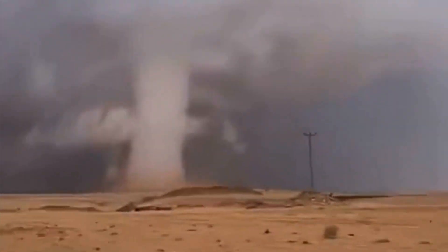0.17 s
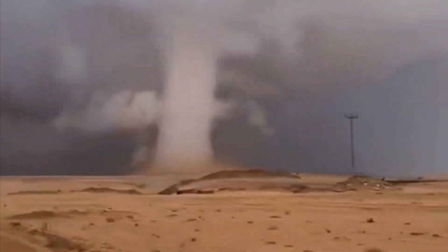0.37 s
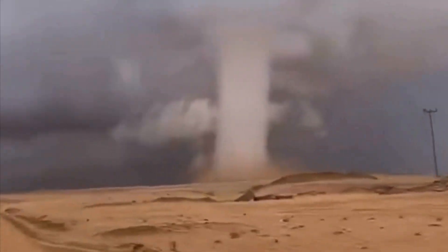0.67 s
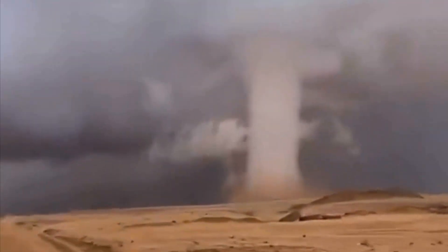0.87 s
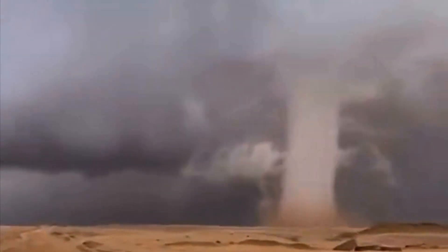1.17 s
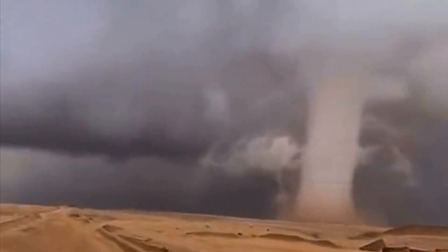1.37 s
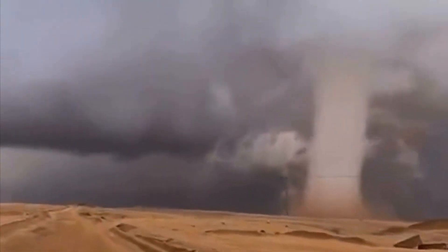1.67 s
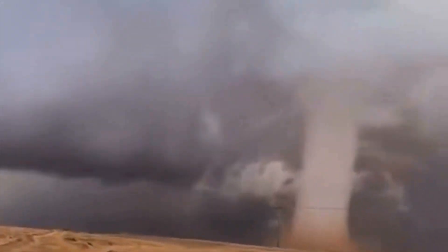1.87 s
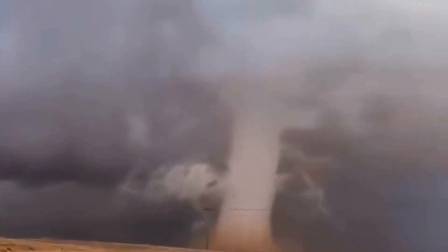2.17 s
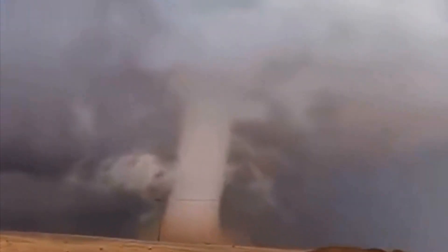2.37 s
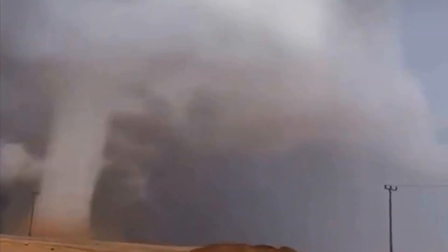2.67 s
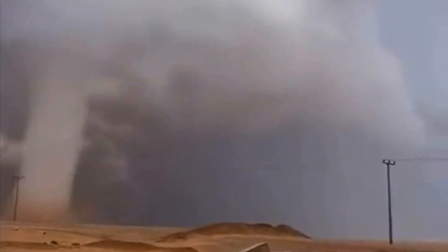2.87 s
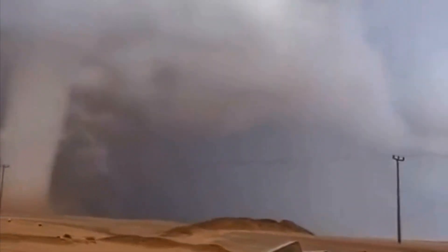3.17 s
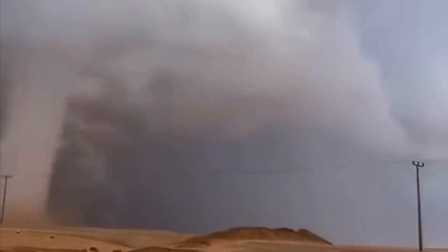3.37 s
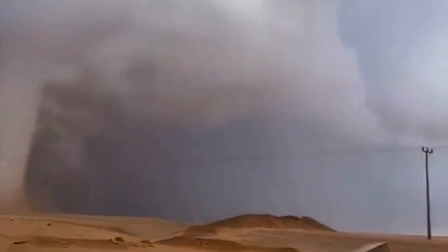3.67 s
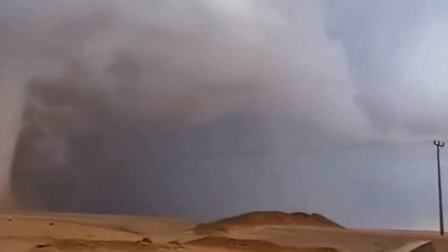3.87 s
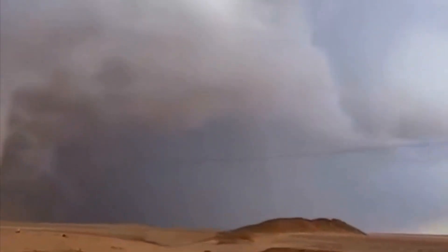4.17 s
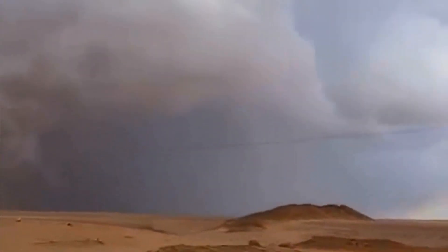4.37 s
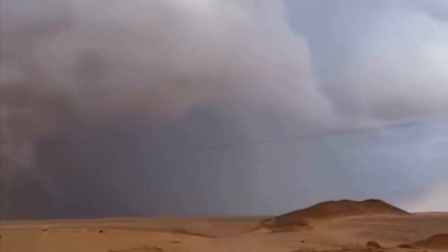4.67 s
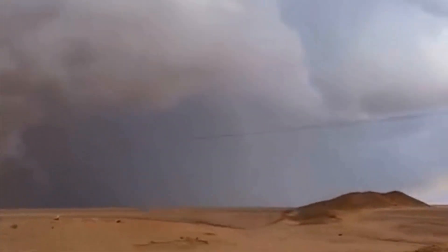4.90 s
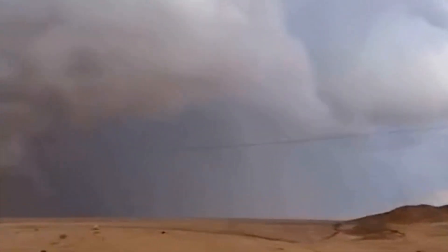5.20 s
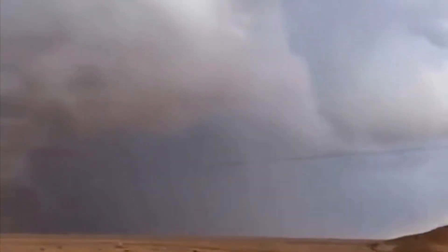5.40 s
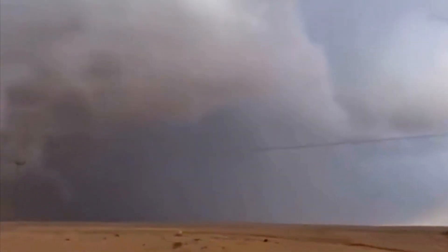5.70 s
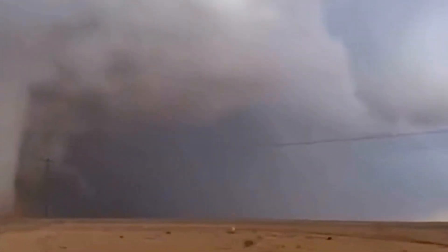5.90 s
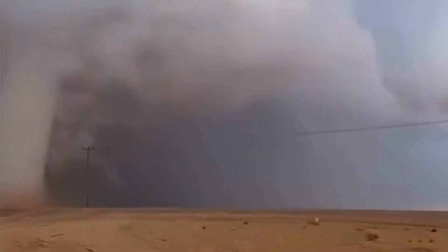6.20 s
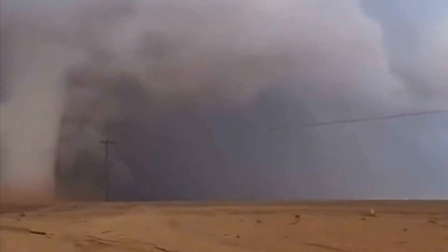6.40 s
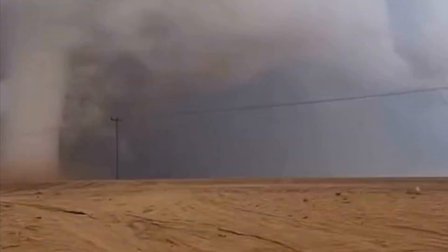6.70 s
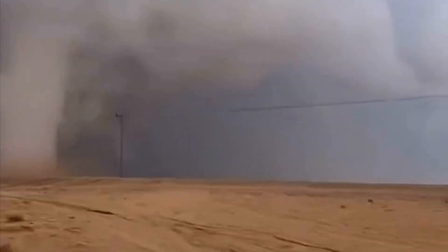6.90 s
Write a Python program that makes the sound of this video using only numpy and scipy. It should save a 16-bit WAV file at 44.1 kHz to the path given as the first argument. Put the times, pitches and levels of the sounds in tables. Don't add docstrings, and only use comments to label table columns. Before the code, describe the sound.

A bare phone microphone faces storm wind on open desert, a tornado standing in the distance. From 0 to 0.8 s, heavy gusts thump and burst, rumble leaping into broad fizz, broken by very short lulls. Around 0.9-1.3 s the roar sinks to dark, lumpy buffeting, with a faint hiss of blown sand rising. Gusts rebuild from 1.4 s, and from about 2.1 to 3.5 s a strong roar flutters quickly, with bright bursts near 3.0 and 3.3 s. From 3.5 to 4.2 s sharper, shorter rips tear through; afterwards they grow sparser and duller over a hollow low throbbing hum. The roar dips near 5.2 s, swells at 5.85 s and again around 6.6 s. At 6.74 s the sound cuts out with a tick, stays silent about 0.2 s, then ticks back at 6.93 s into low rumbling wind until the end at about 7 s. Everything is close, mono and softly saturated.

```python
import sys
import numpy as np
from scipy import signal
from scipy.fft import rfft, irfft, next_fast_len
from scipy.io import wavfile
from scipy.ndimage import uniform_filter1d, minimum_filter1d, map_coordinates

SR = 44100
rng = np.random.default_rng(int(sys.argv[2]) if len(sys.argv) > 2 else 0)


def file_out(sig):
    cols = np.atleast_2d(sig).T
    lim = np.clip(cols, -1, 1)
    pcm = np.round(lim * 32767).astype(np.int16)
    wavfile.write(sys.argv[1], SR, pcm)


def gain_from_db(level_db):
    decades = np.asarray(level_db, float) / 20
    return 10 ** decades


N = 310905
TIME_S = np.arange(N) / SR

# time_s, level_db
ROAR_SWELL = [(0, -9), (.15, -17), (.6, -18), (.95, -20), (1.25, -20), (1.68, -14), (1.9, -17), (2.15, -11),
              (2.6, -10), (3.05, -11), (3.65, -13), (3.95, -18), (4.75, -14), (5.2, -19), (5.85, -12),
              (6.2, -17), (6.6, -13), (7.0, -18)]
# pitch_hz, level_db (per band)
EDDY_SPECTRUM = [(40, 0.5), (110, 4), (220, 1), (400, -8), (800, -11.5), (1600, -23.5), (4000, -31.5),
                 (16000, -59.5)]
# pitch_hz, level_db (per Hz)
BUFFET_SPECTRUM = [(12, -51), (20, -34.5), (43, -1), (98, -1), (200, -15.5), (231, -11.5), (300, -26.5),
                   (390, -43), (660, -120)]
# pitch_hz, level_db (per Hz)
SAND_SPECTRUM = [(530, -9.5), (900, -23.5), (1170, -7), (1310, -7.5), (2550, -8), (3660, -10.5), (7510, -8),
                 (11200, -9), (14900, -13), (15800, -30)]
# pitch_hz, gain_db
PORT_RESPONSE = [(20, -28), (50, 0.5), (2600, -0.5), (8000, -8.5), (11000, -22), (14800, -11),
                 (16000, -12.5)]
# out_s, back_s, tick_out_db, tick_back_db
DROPOUT = (6.738, 6.934, -19.5, -21.5)
# time_s, sand_db, hum_db
SAND_AND_HUM_SWELL = [(0, -43, -25), (.7, -46, -33), (1.0, -36.5, -33), (1.5, -35, -27), (2.0, -38, -24),
                      (2.3, -41, -15), (2.8, -41, -22), (3.25, -42, -19), (3.45, -51, -18), (4.2, -56, -15),
                      (4.95, -57, -17), (5.3, -52, -14), (5.8, -50, -9), (6.15, -53, -14), (6.5, -50, -17)]
# pitch_hz, width_hz
AIR_POCKET = (303, 229)
# centre_s, depth_db, half_length_s
LULLS = [(.046, 14, .025), (.131, 5, .01), (.18, 8, .02), (.317, 14, .025), (.432, 4, .01), (.588, 15, .04),
         (.80, 9, .025), (.94, 5, .02), (1.02, 5, .02), (1.24, 5, .02), (1.42, 9, .02), (1.53, 6, .02),
         (2.04, 3, .03), (2.197, 5, .015), (2.563, 6, .015), (2.697, 10, .025), (2.75, 5, .012),
         (2.89, 4, .02), (3.087, 5, .015), (3.372, 11, .018), (3.42, 5, .01), (3.515, 5, .012),
         (3.815, 5, .02), (3.933, 5, .02), (4.262, 5, .02), (4.435, 7, .018), (5.082, 5, .018),
         (5.509, 4, .015), (5.755, 5, .015), (6.051, 5, .018)]
HEAD_ON = ([.5, .95, 1.4, 2.0, 2.3, 3.0, 3.6, 4.3, 4.7, 5.2, 5.7, 6.7, 6.95], [1, 5, 2, 3, -2, 1.5, 0, 1,
           -3, 1, -4, -1, 6])
# centre_s, fizz_db, width_s
THUMPS = [(0.01, -20, 0.008), (0.097, -18, 0.027), (0.11, -8, 0.013), (0.146, -21, 0.01),
          (0.22, -15, 0.012), (0.246, -15, 0.008), (0.26, -19, 0.009), (0.284, -24, 0.008),
          (0.365, -15, 0.019), (0.416, -25, 0.015), (0.465, -17, 0.016), (0.517, -11, 0.021),
          (0.629, -28, 0.009), (0.673, -11, 0.008), (0.707, -25, 0.026), (0.738, -16, 0.021),
          (0.748, -24, 0.027), (0.838, -18, 0.008), (0.965, -29, 0.016), (0.989, -27, 0.023),
          (1.369, -23, 0.014), (1.383, -23, 0.009), (1.446, -28, 0.01), (1.463, -19, 0.01),
          (1.5, -22, 0.012), (1.555, -18, 0.008), (1.564, -21, 0.031), (1.637, -18, 0.009),
          (1.801, -24, 0.015), (2.017, -26, 0.028)]
FLUTTER = [(2.097, -11, 0.01), (2.136, -9, 0.014), (2.179, -21, 0.03), (2.209, -23, 0.01),
           (2.251, -23, 0.011), (2.311, -14, 0.014), (2.34, -16, 0.013), (2.361, -23, 0.024),
           (2.376, -20, 0.022), (2.423, -20, 0.015), (2.439, -27, 0.02), (2.484, -23, 0.01),
           (2.583, -24, 0.013), (2.627, -23, 0.008), (2.769, -18, 0.009), (2.791, -15, 0.019),
           (2.82, -15, 0.021), (2.843, -26, 0.017), (2.855, -22, 0.009), (2.915, -17, 0.012),
           (2.943, -22, 0.01), (2.989, -8, 0.009), (3.137, -17, 0.01), (3.187, -17, 0.007),
           (3.225, -23, 0.01), (3.268, -23, 0.011), (3.292, -21, 0.013), (3.332, -7, 0.009),
           (3.396, -10, 0.018), (3.432, -21, 0.008)]
RIPS = [(3.492, -27, 0.008), (3.501, -23, 0.007), (3.54, -16, 0.015), (3.561, -11, 0.01),
        (3.629, -32, 0.007), (3.643, -18, 0.007), (3.66, -24, 0.01), (3.673, -21, 0.014),
        (3.709, -16, 0.008), (3.749, -11, 0.008), (3.799, -21, 0.011), (3.848, -33, 0.019),
        (3.873, -13, 0.01), (3.904, -29, 0.016), (3.921, -33, 0.015), (3.981, -11, 0.009),
        (4.024, -26, 0.012), (4.062, -30, 0.028), (4.072, -27, 0.019), (4.108, -26, 0.015),
        (4.126, -28, 0.008), (4.158, -15, 0.01), (4.202, -19, 0.007), (4.312, -27, 0.018),
        (4.34, -27, 0.008), (4.388, -24, 0.013), (4.459, -28, 0.009), (4.653, -24, 0.01),
        (4.75, -26, 0.011), (4.829, -23, 0.009)]
LATE_RIPS = [(4.9, -17, 0.009), (4.913, -26, 0.013), (4.956, -17, 0.01), (5.045, -28, 0.013),
             (5.1, -26, 0.01), (5.147, -29, 0.012), (5.179, -22, 0.009), (5.23, -14, 0.012),
             (5.244, -26, 0.025), (5.276, -32, 0.01), (5.327, -29, 0.009), (5.419, -32, 0.014),
             (5.454, -22, 0.008), (5.542, -23, 0.009), (5.624, -24, 0.023), (5.815, -21, 0.009),
             (5.852, -28, 0.014), (5.943, -29, 0.013), (6.011, -25, 0.01), (6.143, -29, 0.021),
             (6.398, -18, 0.009), (6.433, -24, 0.014), (6.463, -19, 0.01), (6.497, -32, 0.012),
             (6.534, -27, 0.013), (6.574, -22, 0.017), (6.612, -29, 0.008), (6.638, -15, 0.01),
             (6.677, -24, 0.021), (6.946, -23, 0.014)]
# still_db (fizz over roar at no added speed), fizz_db_per_octave, pressure_db_per_octave
PUFF_LAWS = [
    (-16, 14.5, 11),
    (-22, 9.3, 3.8),
    (-23, 7.5, 1.2),
    (-23, 7.5, 1.2),
]

CALM_OCTAVES = 0.4
BUFFET_DB = -11
BUFFET_FOLLOWS, BUFFET_SHELTER = 0.2, 0.6
STRAYS_PER_S, STRAY_OCTAVES, STRAY_S = 35, 0.33, 0.004
TOP_HZ = 15800


def unit(x):
    return x / np.sqrt(np.mean(x ** 2, axis=-1, keepdims=True) + 1e-20)


def along(points, hz):
    f, v = np.transpose(points)
    return np.interp(np.log(hz + 1), np.log(f + 1), v)


def curves(rows):
    s, *columns = np.transpose(rows)
    return [np.interp(TIME_S, s, column) for column in columns]


def wobble(rate):
    knot = np.arange(N) * np.clip(rate, .1, 500) / SR
    return map_coordinates(rng.standard_normal(4000), [knot])


def filtered(x, gain):
    size = next_fast_len(N + 8192)
    hz = np.fft.rfftfreq(size, 1 / SR)
    return irfft(rfft(x, size) * gain(hz), size)[..., :N]


def noise(spectrum):
    return unit(filtered(rng.standard_normal(N), lambda hz: gain_from_db(along(spectrum, hz))))


def shelter():
    return sum(depth_db * np.exp(-((TIME_S - s) / half) ** 2) for s, depth_db, half in LULLS)


def buffet(level_db):
    lumps = gain_from_db(3.1 * wobble(14) + 0.98 * wobble(3.4))
    return gain_from_db(level_db - 3.0) * unit(lumps * noise(BUFFET_SPECTRUM))


def stray_puffs():
    gap, size, span = rng.exponential(size=(400, 3)).T
    centres_s = np.cumsum(gap) / STRAYS_PER_S
    return [(s, STRAY_OCTAVES * (1 + e) / 2, STRAY_S * (1 + w) / 2, 1.5)
            for s, e, w in zip(centres_s, size, span) if s < N / SR]


def puffs(roar_db):
    speed, push, rows = np.zeros(N), np.zeros(N), []
    for table, (still_db, per_octave_db, push_db) in zip([THUMPS, FLUTTER, RIPS, LATE_RIPS], PUFF_LAWS):
        for s, fizz_db, width in table:
            octaves = (fizz_db - roar_db[round(s * SR)] - still_db) / per_octave_db
            rows.append((s, octaves, width - .003, push_db))
    rows += stray_puffs()
    for s, octaves, length, push_db in rows:
        at = np.arange(max(0, round((s - .04) * SR)), min(N, round((s + .06) * SR)))
        u = (at / SR - s) / np.clip(length, .003, .02)
        skewed = np.where(u < 0, 1.4 * u, .9 * u)
        bump = np.exp(-np.abs(skewed) ** 2.2) * np.clip(octaves, 0, 4)
        speed[at] = np.maximum(speed[at], bump)
        push[at] = np.maximum(push[at], bump * push_db)
    return speed * (1 + 0.17 * wobble(500) + 0.04 * wobble(120)), push


def eddies(roar_db, speed):
    centres = 40 * 2 ** (np.arange(18) / 2)

    def bell(hz):
        octaves_off = np.log2(hz / centres[:, None] + 1e-9)
        return np.cos(np.pi * np.clip(octaves_off, -.5, .5)) ** 2

    bands = unit(filtered(rng.standard_normal(N), bell))
    puff_speed, push_db = puffs(roar_db)
    speed = speed + puff_speed + 0.24 * wobble(25) + 0.23 * wobble(90) + 0.36 * wobble(300)
    level_db = roar_db - 9 + push_db + 0.69 * wobble(14)
    return sum(band * gain_from_db(level_db + along(EDDY_SPECTRUM, hz / 2 ** speed)) for hz, band in zip(centres, bands))


def sand(level_db):
    flutter_db = 1.6 * wobble(30) + .7 * wobble(9)
    return gain_from_db(level_db + 8.5 + flutter_db) * noise(SAND_SPECTRUM)


def hum(level_db):
    centre, width = AIR_POCKET

    def resonance(hz):
        loss = (hz * width) ** 2
        return loss / ((centre ** 2 - hz * hz) ** 2 + loss)

    pocket = filtered(rng.standard_normal(N), resonance)
    throbs = gain_from_db(3.8 * wobble(18))
    return gain_from_db(level_db + 0.5) * unit(throbs * pocket)


def scene():
    roar_db, = curves(ROAR_SWELL)
    sand_db, hum_db = curves(SAND_AND_HUM_SWELL)
    lull_db = shelter()
    buffet_db = BUFFET_DB + np.interp(TIME_S, *HEAD_ON)
    buffet_db = buffet_db + BUFFET_FOLLOWS * (roar_db - roar_db.mean()) - BUFFET_SHELTER * lull_db
    hum_db[round(DROPOUT[0] * SR):] -= 9
    thumps = buffet(buffet_db)
    roar = eddies(roar_db - lull_db, CALM_OCTAVES)
    mix = thumps + roar + sand(sand_db) + hum(hum_db - 0.4 * lull_db)
    return mix[None]


def saturate(x):
    need = np.minimum(1, 1.0 / (np.abs(x) + 1e-9))
    x = x * uniform_filter1d(minimum_filter1d(need, size=161), size=161)
    return x / (1 + np.abs(x) ** 8) ** (1 / 8)


def drop_out(x):
    out, back, tick_out_db, tick_back_db = DROPOUT
    t = TIME_S
    tail = gain_from_db(-40 - 1900 * (t - out).clip(0, 1)) * (t < out + .022)
    recovery = np.clip(.2 + (t - back) / .007, 0, 1)
    gate = np.where(t > out, np.where(t < back, tail, recovery), 1)
    gate = uniform_filter1d(gate, size=41)

    def tick(s):
        return (t > s - .0015) & (t <= s)

    x = x * gate + gain_from_db(tick_out_db) * tick(out) + gain_from_db(tick_back_db) * tick(back + .0015)
    return filtered(x, lambda hz: hz < TOP_HZ) * (gate > 0)


def top_cut(x):
    return signal.sosfilt(signal.butter(12, 16330, fs=SR, output="sos"), x)


def record(dry):
    coloured = filtered(dry, lambda hz: gain_from_db(along(PORT_RESPONSE, hz)))
    mix = drop_out(saturate(coloured))
    return top_cut(mix)


dry = scene()
out = record(dry)
file_out(out)
```